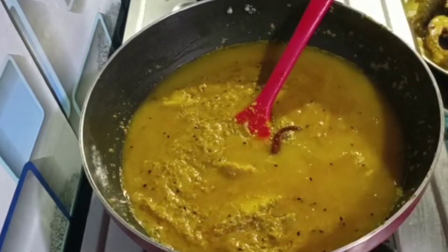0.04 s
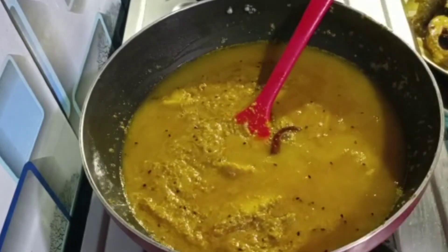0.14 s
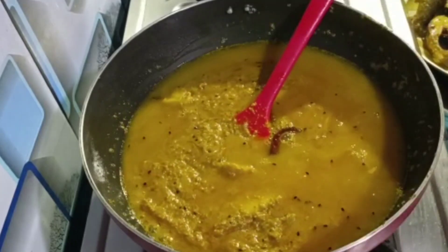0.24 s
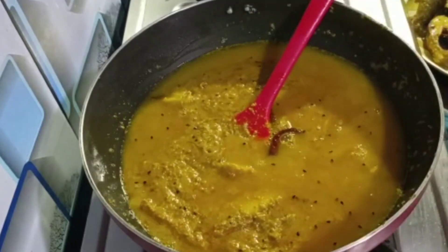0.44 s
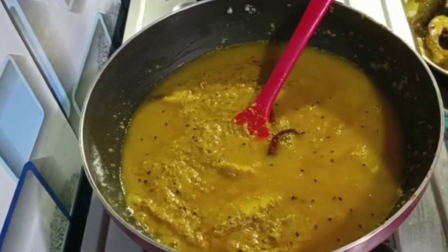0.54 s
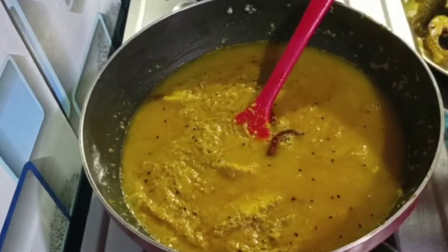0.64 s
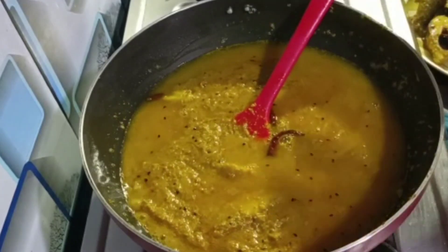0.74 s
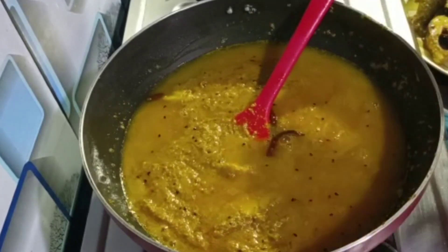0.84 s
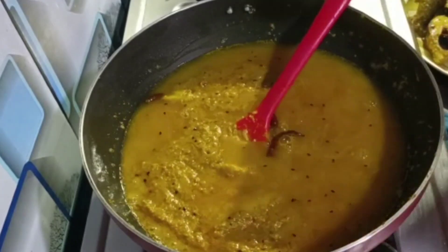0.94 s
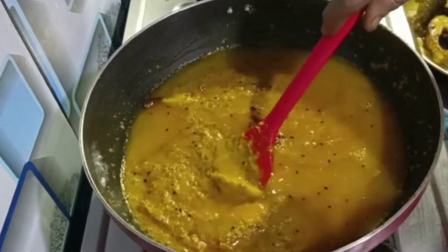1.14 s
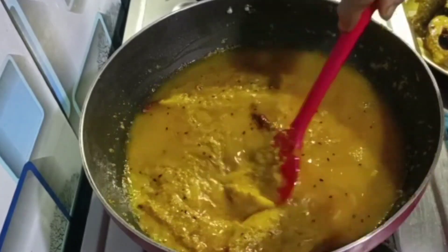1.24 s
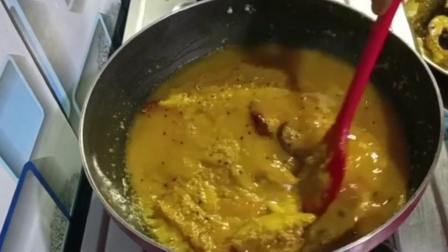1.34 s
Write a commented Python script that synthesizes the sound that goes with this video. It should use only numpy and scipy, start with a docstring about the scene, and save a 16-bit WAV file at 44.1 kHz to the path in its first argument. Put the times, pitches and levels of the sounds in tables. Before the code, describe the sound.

A utensil clanks against a metal pan, then a duller knock, over a very faint sizzle.

```python
"""At a stove, close above a pan of watery paste that sizzles faintly as tiny bubbles burst.
A utensil clanks; the metal rings briefly, then drops away quickly, as through a noise gate. A duller
knock thumps the pan on its support. Then things are shifted: the pan bumps softly, and sliding
friction gives faint squeaks and a short juddering rub. Larger bubbles spit and steam throughout."""
import sys
import numpy as np
from scipy.fft import rfft, irfft
from scipy.io import wavfile

SR = 44100
rng = np.random.default_rng(int(sys.argv[2]) if len(sys.argv) > 2 else 0)


def transcribe(u):
    """Save the signal u as a 16-bit wav file named by the first command-line argument.

    u: samples, shape (n,) or (channels, n), limited to [-1, 1]; the rate is SR.
    q: integer samples, one column per channel.
    """
    v = np.clip(np.atleast_2d(u).T, -1, 1)
    q = np.round(v * 32767).astype(np.int16)
    wavfile.write(sys.argv[1], SR, q)


N = 61739
T = np.arange(N) / SR
HZ = np.maximum(np.arange(N // 2 + 1) * SR / N, 1)


def blows():
    """Impact: a light touch, then thump, clatter and ring, with a bright tick just after the onset."""
    # Each row: start in seconds, thump, prompt ring and late ring in dB, muted frequency in Hz,
    # clatter in dB, its low-pass corner in Hz, tick in dB, hold time before the drop in seconds.
    impacts = [(0.2243, -26.5, -23, -26, 1830, -54.5, 3410, -102.5, 0.15),
               (0.497, -22.5, -39, -73.5, 2250, -60, 590, -73.5, 0.13)]
    # Spectrum of the contact tick. Each row: frequency in Hz, level in dB.
    tick_spectrum = [(1500, 3.5), (2500, -29), (3500, -6.5), (5000, 2.5), (7500, -21.5), (10000, -0.5),
                     (12000, 0), (16000, -14)]
    touch_lead_s, tick_delay_s, gate_s = 0.018, 0.0058, 0.037
    out = 0
    for start, thump_db, prompt_db, late_db, muted_hz, clatter_db, dull_hz, tick_db, held in impacts:
        pressure = swell(start - touch_lead_s, 2 * touch_lead_s)
        touch = from_db(thump_db - 28) * pressure * resonant_noise(hz=400, width_hz=2700)
        crack = 1.6 * strike(start + tick_delay_s, attack=0.00035, t60=0.018)
        tail = strike(start + tick_delay_s, attack=0.00045, t60=0.2)
        tick = colour(noise(), from_db(tick_db + at_hz(tick_spectrum, HZ))) * (crack + tail)
        body = from_db(thump_db) * thump(start) + from_db(clatter_db) * clatter(start, dull_hz)
        ring = metal_ring(start, prompt_db, late_db, muted_hz)
        # Body and ring hold briefly, then drop away quickly, as through a noise gate.
        gated = np.clip((T - start - held) / gate_s, 0, 1)
        out = out + touch + tick + body * from_db(-10 * gated) + ring * from_db(-7 * gated)
    return out


def metal_ring(start, prompt_db, late_db, muted_hz):
    """Free vibration: modes sound at the blow and swell again as the utensil lets the metal ring."""
    # Each row: frequency in Hz, prompt and late levels in dB, 60 dB decay time in seconds,
    # level of left over right in dB, phase lead of the left in radians.
    modes = [(344.2, -22.5, -15, 0.85, 2.5, -0.5), (480, -15, -11.5, .28, 8, 4),
             (587.6, -6, -43, .5, 7, 2.5), (681.6, -2.5, -44, 0.29, 6.5, -5),
             (731, -0.5, -23, 0.19, -2, -0.5), (868.5, -0.5, -22, 0.091, 0.5, -3.5),
             (1087, 4.5, -4.5, 0.3, -4, -1.5), (1412, -12.5, -2.5, 0.4, -7, 1.5),
             (1580, -4, -6, 0.63, 4, 3), (2063, -18, 2, 0.3, 2, 2.12), (2332, -10, 5.5, 0.32, 5, -0.6),
             (2796, -15, -16.5, 0.49, -4, 3.5), (3237, -13.5, -17.5, 0.093, 1.5, -1.5),
             (3488, 2, -14, 0.27, -1.5, 4), (3492, -6, 10.5, 0.24, -5, 1.12), (4690, 0, -13, 0.16, 14, 4.8),
             (5080, -33, -31, .2, -4, -3), (6210, -9.5, -25, 0.14, 16, 4.5), (7770, -17, -19, 0.16, 6.5, 2)]
    late_delay_s, late_rise_s, prompt_rise_s = 0.041, 0.039, 0.0028
    muted_width = 0.071  # the contact point mutes a band this wide, as a share of its frequency
    sides = np.array([[0.5], [-0.5]])
    late_age = np.maximum(T - start - late_delay_s, 0)
    freed = np.sin(np.pi / 2 * np.minimum(late_age / late_rise_s, 1)) ** 2
    out = 0
    for hz, mode_prompt_db, mode_late_db, t60, balance_db, lead in modes:
        coupling = 1 - np.exp(-((hz / muted_hz - 1) / muted_width) ** 2)
        prompt = coupling * from_db(prompt_db + mode_prompt_db) * strike(start, prompt_rise_s, t60)
        late = freed * from_db(late_db + mode_late_db - 60 * late_age / t60)
        partial = np.sin(2 * np.pi * hz * (T - start) + lead * sides)
        out = out + from_db(balance_db * sides) * (prompt + late) * partial
    return out


def thump(start):
    """Decaying oscillation of the pan on its support; low modes close in frequency beat."""
    # Each row: frequency in Hz, level in dB, 60 dB decay time in seconds.
    modes = [(120.2, -5, 0.9), (142.3, -0.5, 0.39), (235.5, -9, 0.41), (276.3, 3.5, .38), (314.8, 3, 0.067)]
    out = 0
    for k, (hz, db, t60) in enumerate(modes):
        envelope = from_db(db) * strike(start, attack=1 / (2 * hz), t60=t60)
        out = out + (-1) ** k * envelope * np.sin(2 * np.pi * hz * (T - start))
    return out


def clatter(start, dull_hz):
    """Reverberation: crowded modes of stove and room, each band decaying at its own rate."""
    # Each row: frequency in Hz, level in dB, 60 dB decay time in seconds.
    response = [(39.5, -23, 0.62), (130, -6, 0.65), (297, 2, .46), (744, 7.5, 0.28), (1520, 3.5, 0.26),
                (1770, -12.5, 0.14), (2250, -2.5, .25), (2670, -7.5, 0.17), (3340, 2, 0.46),
                (3980, -5.5, 0.42), (4700, -1.5, 0.32), (6950, -16, .22), (15200, 14, 0.2)]
    mode_gap_hz = np.minimum(0.012 * HZ, 44.8)
    modes_per_bin = np.minimum(SR / N / mode_gap_hz, 1)
    modes_below = np.floor(np.cumsum(modes_per_bin * rng.exponential(1, len(HZ))))
    mode_count = np.diff(modes_below, prepend=0)
    gain = from_db(at_hz(response, HZ)) / np.sqrt(1 + (HZ / dull_hz) ** 4)
    spectrum = rfft(noise()) * np.sqrt(mode_count / modes_per_bin) * gain
    edges_hz = np.geomspace(20, 20000, 16)
    out = 0
    for low, high in zip(edges_hz, edges_hz[1:]):
        t60 = at_hz(response, np.sqrt(low * high), column=2)
        out = out + band(spectrum, low, high) * strike(start, attack=0.003, t60=t60)
    return out


def rub():
    """Forced vibration: juddering friction drives two resonances in a few short strokes."""
    # Each row: centre frequency in Hz, bandwidth in Hz, level in dB.
    resonances = [(1322, 156, 2), (2300, 690, -16)]
    # Each row: start in seconds, length in seconds, level in dB.
    strokes = [(0.732, 0.12, -64), (0.885, 0.09, -52.5), (0.953, 0.073, -45.5), (1.023, 0.096, -46.5),
               (1.109, 0.072, -62.5)]
    judder_hz, judder_depth = 65, 0.13
    body = sum(from_db(db) * resonant_noise(hz, width) for hz, width, db in resonances)
    judder = 1 + judder_depth * np.sin(2 * np.pi * judder_hz * T)
    envelope = sum(from_db(db) * swell(start, length) for start, length, db in strokes)
    return body * judder * envelope


def bumps():
    """Soft contact excites only low resonances, so the pan rumbles as it shifts."""
    # Each row: start in seconds, length in seconds, level in dB, resonance in Hz.
    contacts = [(0.651, 0.036, -46.5, 113), (0.726, 0.12, -53, 118), (0.838, 0.082, -46.5, 112),
                (.91, 0.085, -55.5, 107), (1.063, 0.17, -60.5, 86)]
    upper_resonance = from_db(-11) * resonant_noise(hz=213, width_hz=130)
    return sum(from_db(db) * swell(start, length) * (resonant_noise(hz, width_hz=57) + upper_resonance)
               for start, length, db, hz in contacts)


def squeaks():
    """Friction-induced oscillation: sliding contact gives short, rough tones that glide slightly."""
    # Each row: start in seconds, length in seconds, level in dB, first and last pitch in Hz.
    slides = [(0.426, 0.061, -47, 990, 1002), (0.722, 0.099, -55, 425, 412.4),
              (0.802, 0.142, -51, 512, 498)]
    out = 0
    for start, length, db, start_hz, end_hz in slides:
        pitch_hz = np.interp(T, [start, start + length], [start_hz, end_hz])
        tone = np.sqrt(2) * np.sin(2 * np.pi * np.cumsum(pitch_hz) / SR)
        roughness = 0.76 * resonant_noise(start_hz, width_hz=54)
        out = out + from_db(db) * swell(start, length) * (tone + roughness)
    return out


def spits():
    """Transient noise: larger bubbles spit and puff steam, each in its own treble band."""
    # Each row: start in seconds, level in dB, attack and 60 dB decay time in seconds, centre in Hz.
    bubbles = [(0.073, -83, 0.0037, 0.23, 8800), (0.3107, -77.5, 0.00075, 0.18, 9900),
               (.57, -74.5, 0.04, 0.15, 5560), (0.681, -82.5, 0.0011, 0.048, 8600),
               (.719, -83, 0.00093, 0.04, 11400), (0.809, -76.5, 0.024, 0.16, 14000),
               (.99, -81.5, 0.025, 0.38, 15500), (1.052, -83.5, 0.0013, .06, 11000),
               (1.142, -83.5, .002, .06, 10370), (1.329, -79.5, 0.0015, 0.025, 10180)]
    half_width_octaves = 0.26
    spray = noise()
    out = 0
    for start, db, attack, t60, hz in bubbles:
        passband = 1 / (1 + (np.log2(HZ / hz) / half_width_octaves) ** 2)
        out = out + from_db(db) * strike(start, attack, t60) * colour(spray, passband)
    return out


def sizzle():
    """Shot noise: thousands of tiny random bursts over a smooth hiss, flickering band by band."""
    # Course of the sizzle. Each row: time in seconds, level in dB.
    levels = [(0, -95.5), (.15, -98.5), (.42, -97.5), (.55, -98), (.66, -103), (.74, -97), (.84, -97.5),
              (.93, -98.5), (1.05, -99), (1.11, -100), (1.27, -100), (1.4, -102)]
    # Its spectrum. Each row: frequency in Hz, gain in dB.
    timbre = [(30, -16.5), (120, 5), (200, 0.5), (280, -5), (520, 4), (950, -5), (1370, 8.5), (1700, 3.5),
              (3000, 1), (6000, -0.5), (10000, 2), (16000, 1)]
    # Edges in Hz of the bands that flicker independently.
    edges_hz = [0, 1000, 2000, 3000, 4000, 5000, 6300, 7800, 9500, 11500, 13500, 23000]
    bursts_per_s, burst_spread_db, hiss_share = 11000, 3.5, 0.55
    flicker_db, flicker_hz = 2.37, 30
    sizes = from_db(burst_spread_db * np.minimum(rng.exponential(1, (2, N)), 5))
    signs = rng.choice([-1, 1], (2, N))
    bursting = rng.random((2, N)) < bursts_per_s / SR
    bursts = stereo(sizes * signs * bursting)
    crackle = np.sqrt((1 - hiss_share) * SR / 2) * bursts / bursts.std()
    hiss = np.sqrt(hiss_share) * noise()
    spectrum = rfft(crackle + hiss) * from_db(at_hz(timbre, HZ))
    fizz = sum(band(spectrum, low, high) * from_db(flicker_db * drift(flicker_hz))
               for low, high in zip(edges_hz, edges_hz[1:]))
    return fizz * from_db(np.interp(T, *np.transpose(levels)))


def strike(start, attack, t60):
    """Exponential rise and decay, falling 60 dB in t60 seconds."""
    age = np.maximum(T - start, 0)
    return (1 - np.exp(-age / attack)) * from_db(-60 * age / t60)


def swell(start, length):
    """Half-sine envelope of a soft stroke."""
    return np.sin(np.pi * np.clip((T - start) / length, 0, 1))


def drift(corner_hz):
    """Random modulation: low-passed noise of zero mean and unit deviation."""
    x = colour(rng.standard_normal(N), 1 / (1 + (HZ / corner_hz) ** 2))
    return (x - x.mean()) / x.std()


def resonant_noise(hz, width_hz):
    """Response of one steep resonance to noise, scaled to an rms of 1."""
    x = colour(noise(), 1 / (1 + (2 * (HZ - hz) / width_hz) ** 2))
    return x / x.std()


def noise():
    """White stereo noise with a spectral density of 0 dB per Hz."""
    return stereo(rng.standard_normal((2, N))) * np.sqrt(SR / 2)


def stereo(pair):
    """Partial coherence: two independent signals mix into left and right, alike in the bass."""
    # Each row: frequency in Hz, correlation between left and right.
    coherence = [(150, 0.88), (300, 0.55), (700, 0.28), (1200, 0), (3000, 0.082), (6000, 0)]
    alike = at_hz(coherence, HZ)
    mid = colour(pair[0], np.sqrt((1 + alike) / 2))
    side = colour(pair[1], np.sqrt((1 - alike) / 2))
    return mid + side * [[1], [-1]]


def band(spectrum, low, high):
    """Ideal band-pass: the waveform of a spectrum between two frequencies."""
    return irfft(spectrum * ((HZ >= low) & (HZ < high)), N)


def colour(x, gain):
    """Zero-phase filtering by a gain for every frequency."""
    return irfft(rfft(x) * gain, N)


def at_hz(points, hz, column=1):
    """Interpolation of a table column along log frequency."""
    table = np.array(points)
    return np.interp(np.log(hz), np.log(table[:, 0]), table[:, column])


def from_db(db):
    """Amplitude ratio for a level in decibels."""
    return 10 ** (np.asarray(db) / 20)


def scene():
    """Superposition of all the sources at the stove."""
    return blows() + sizzle() + spits() + bumps() + squeaks() + rub()


def record(dry):
    """Frequency response: each microphone port colours its side, and a steep low-pass cuts the top."""
    # Responses of the two ports. Each row: frequency in Hz, gain in dB.
    left_port = [(250, -2), (500, -6), (3000, -1.5), (3750, -4.5), (4150, -11), (4900, -12.5), (5500, -26),
                 (6000, -6), (6800, -25.5), (7400, -5), (8300, -1.5), (9400, 7.5), (10800, 2), (15500, 1)]
    right_port = [(250, -1), (500, -6), (3000, -2.5), (3800, -2), (4150, -4.5), (4700, -5.5), (5400, 9),
                  (6800, 7.5), (8000, -2), (9200, -16), (11500, -4), (14000, -6.5)]
    cutoff_hz = 15780
    heard = colour(dry, from_db([at_hz(left_port, HZ), at_hz(right_port, HZ)]))
    return colour(heard, 1 / np.sqrt(1 + (HZ / cutoff_hz) ** 240))


dry = scene()
out = record(dry)
transcribe(out)
```